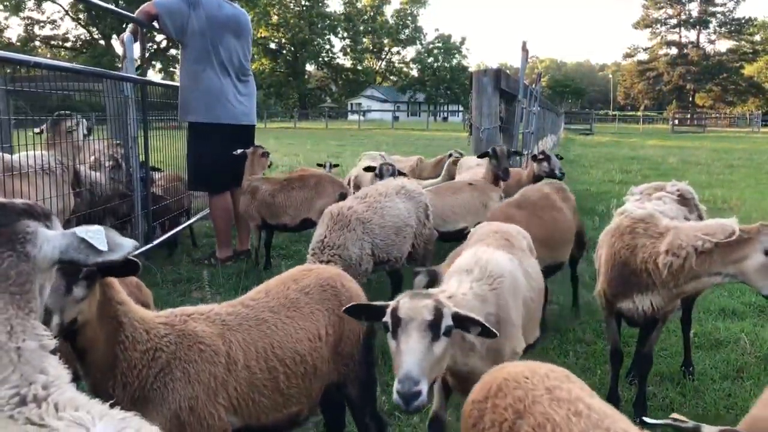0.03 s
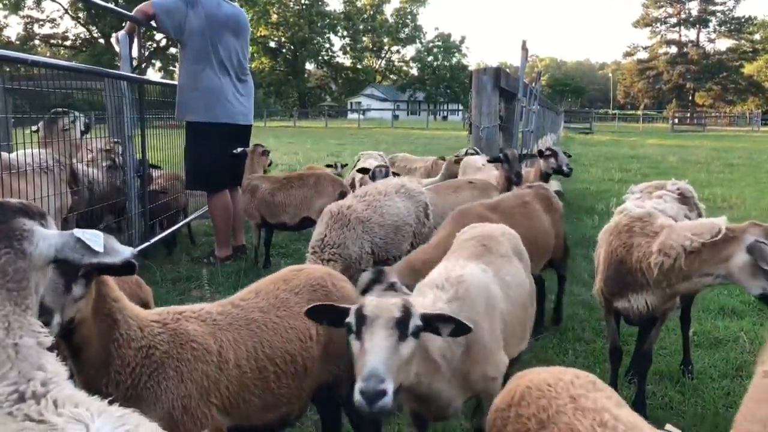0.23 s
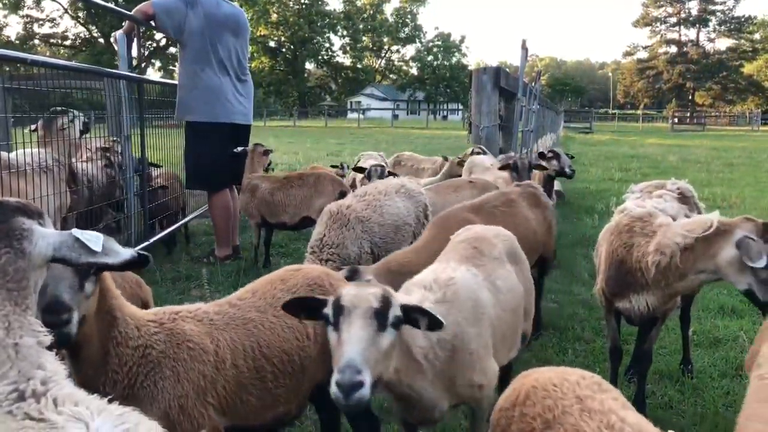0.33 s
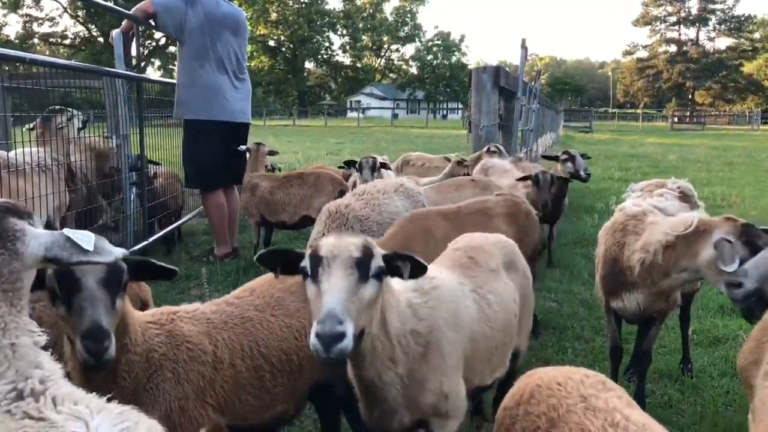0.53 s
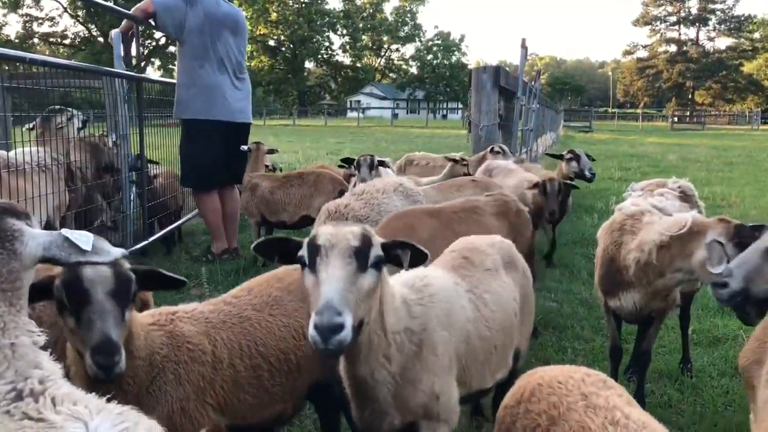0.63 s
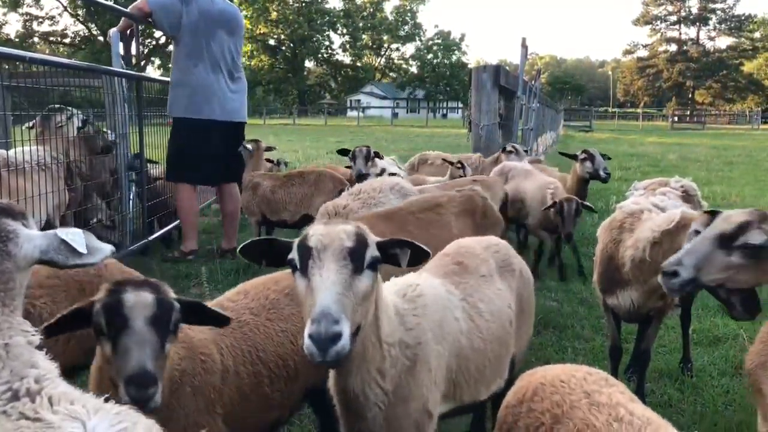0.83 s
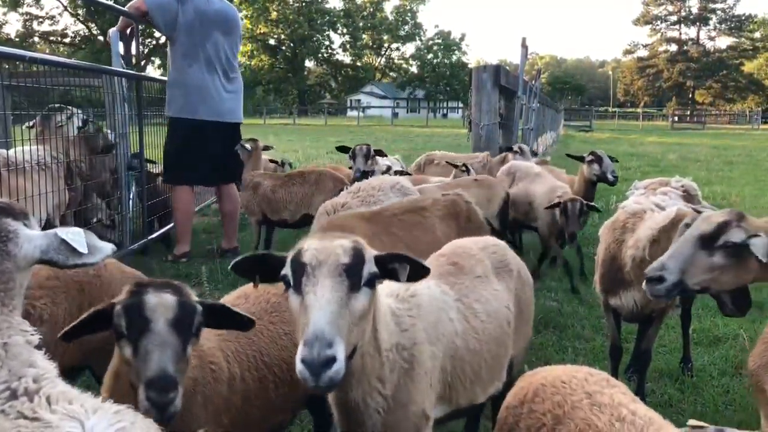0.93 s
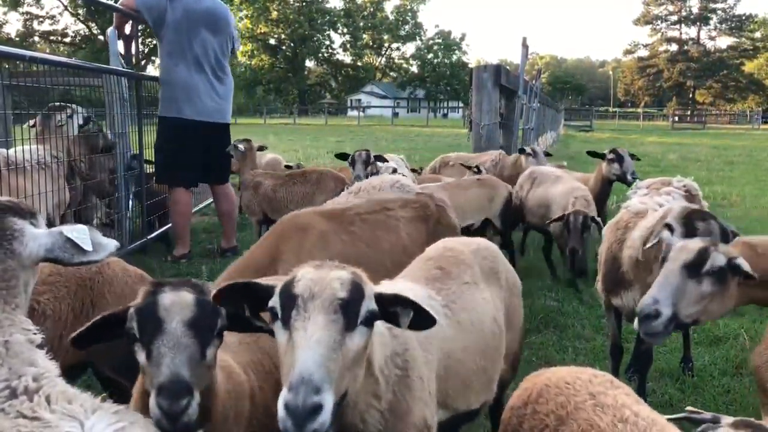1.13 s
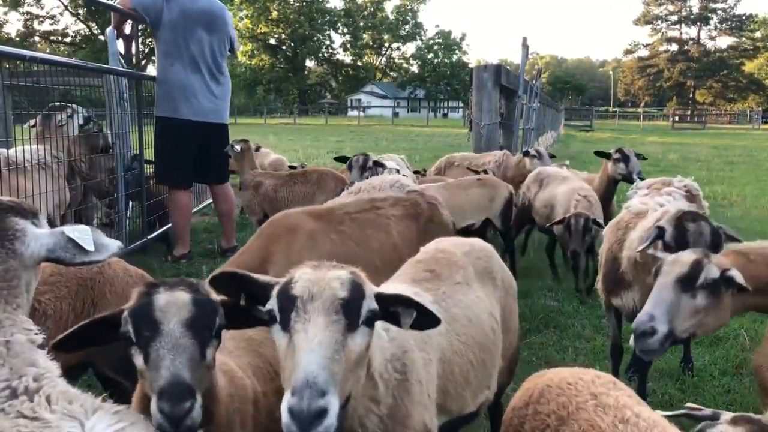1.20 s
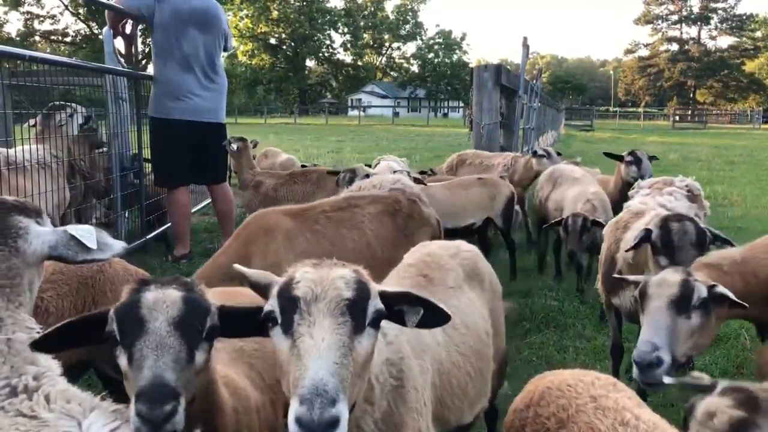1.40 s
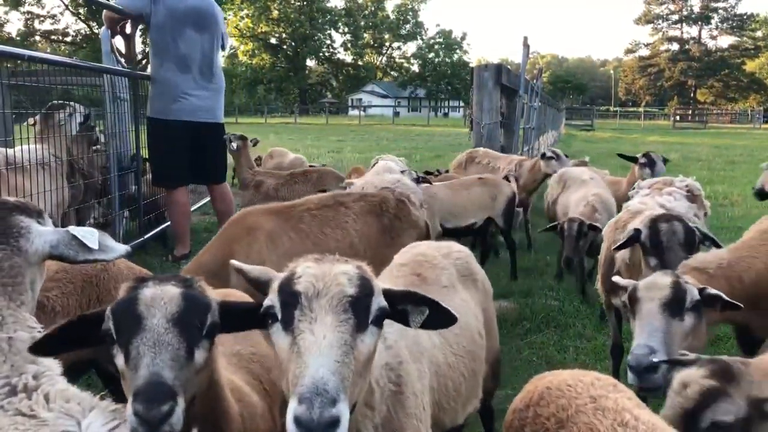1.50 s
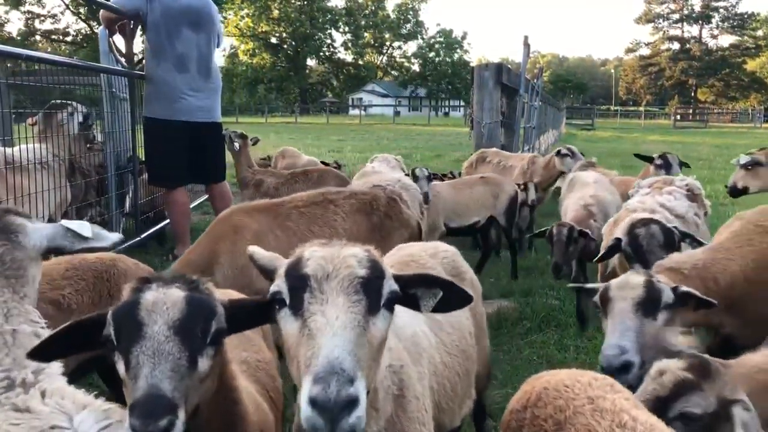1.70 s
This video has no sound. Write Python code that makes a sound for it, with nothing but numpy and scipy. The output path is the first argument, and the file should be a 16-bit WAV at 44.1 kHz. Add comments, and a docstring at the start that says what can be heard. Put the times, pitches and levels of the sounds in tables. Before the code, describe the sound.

A nearby sheep bleats once in a quiet field. After soft hoof thuds around 0.15 seconds, the call starts as a rasp at 0.25, swells into a buzzing, quavering 'eh', loudest near 0.7, and sags away by 1.15. A hoof snaps a stalk at 1.3, and a faint, distant bird chirps near 1.5. Light grass rustle and a low, far engine hum run throughout.

```python
"""A grassy field, where one sheep in a flock gives a long, quavering bleat. Uneven slaps of its vocal
folds and puffs of air ring the throat: the call starts as a rasp, opens into a buzzing 'eh' and sags
away as the jaw closes, scattered by the fence, the flock and the trees. Hooves snap stalks and thud
in the rustling grass, a bird chirps once far off, and a distant engine hums low."""
import sys
import numpy as np
from scipy import signal
from scipy.fft import rfft, irfft, next_fast_len
from scipy.io import wavfile
from scipy.ndimage import uniform_filter1d, map_coordinates

SR = 44100
rng = np.random.default_rng(int(sys.argv[2]) if len(sys.argv) > 2 else 0)


def to_wav(sig):
    """Store sig (one row per channel, or 1-D mono) as 16-bit WAV at the path in sys.argv[1].

    Samples outside -1..1 are clipped; the rate is SR.
    """
    pcm = np.clip(np.atleast_2d(sig), -1, 1) * 32767
    pcm = np.round(pcm).astype(np.int16)
    wavfile.write(sys.argv[1], SR, pcm.T)  # frames by channels


N = 77175
TIME = np.arange(N) / SR

# The quavering tune of the folds. Each row: time in seconds, pitch in Hz.
BLEAT_PITCH = [(.24, 112), (.27, 130), (.297, 115), (.33, 124), (.358, 144), (.378, 133), (.398, 140),
               (.412, 151), (.428, 156), (.461, 141), (.498, 155), (.528, 147.5), (.585, 153), (.652, 139),
               (.68, 156), (.72, 150.5), (.742, 139), (.785, 153.5), (.812, 138), (.842, 134), (.88, 149),
               (.91, 137), (.945, 132), (.985, 138), (1.036, 136), (1.062, 124), (1.085, 125), (1.14, 107)]
# How hard the sheep pushes. Each row: time in seconds, relative level in dB.
BLEAT_EFFORT = [(.23, -58.5), (.238, -47), (.272, -45.5), (.302, -48.5), (.317, -43.5), (.365, -41.5),
                (.395, -38.5), (.43, -36), (.46, -37), (.52, -37), (.63, -35.5), (.71, -35), (.75, -36),
                (.86, -38.5), (.895, -38), (.94, -40.5), (.99, -40), (1.05, -42.5), (1.103, -45),
                (1.122, -53), (1.165, -61.5)]
VOICE_DB, QUAVER_DB_PER_HZ, QUAVER_S = 9, 0.38, 0.037

def bleat():
    """Breath drives the folds through the moving mouth, louder on each crest of the pitch."""
    pitch = curve(BLEAT_PITCH)
    quaver_db = QUAVER_DB_PER_HZ * (pitch - uniform_filter1d(pitch, int(QUAVER_S * SR)))
    gate = (TIME > BLEAT_EFFORT[0][0]) & (TIME < BLEAT_EFFORT[-1][0])
    buzz = smear(vocal_folds(pitch)) * amp(VOICE_DB + curve(BLEAT_EFFORT) + quaver_db) * gate
    return low_ring(mouth(buzz))


# The gravel in the voice. Each row: time in seconds, roughness from 0 to 1.
ROUGHNESS = [(.24, .6), (.37, .55), (.42, .3), (.5, .24), (.72, .22), (.85, .3), (.95, .28), (1.01, .38),
             (1.1, .42)]
# Air forced through the folds. Each row: frequency in Hz, gain in dB.
RASP_EQ = [(100, -26.5), (600, -5), (1200, -17.5), (2500, -9.5), (4500, 7.5), (9000, -6)]
JITTER_S, SHIMMER_DB, RASP_DB = 0.0003, 3, 7.5  # at full roughness
FLAP_SHARE, FLAP_PHASE, PUFF_DECAY = 0.44, 0.425, 1.18

def vocal_folds(pitch):
    """Each cycle is a slap and a fading puff of air; roughness adds a second, weaker flap."""
    roughness = curve(ROUGHNESS)
    cycles = np.cumsum(pitch) / SR
    times = np.interp(np.arange(1, int(cycles[-1])), cycles, TIME)
    jitter, shimmer, flap_jitter, flap_shimmer = rng.standard_normal((len(times), 4)).T
    rough, hz = np.interp(times, TIME, roughness), np.interp(times, TIME, pitch)
    sizes = np.sqrt(SR / hz) * amp(SHIMMER_DB * rough * shimmer)
    slaps = pulses(times + JITTER_S * rough * jitter, sizes)
    flap_sizes = sizes * FLAP_SHARE * rough ** 2 * amp(SHIMMER_DB * flap_shimmer)
    flaps = pulses(times + FLAP_PHASE / hz + 2 * JITTER_S * flap_jitter, flap_sizes)
    puffs = amp(RASP_DB) * roughness * unit(noise(RASP_EQ) * np.exp(-PUFF_DECAY * (cycles % 1)))
    return puffs - slaps - flaps


# The spread of one slap. Each row: frequency in Hz, delay in seconds.
SLAP_LAG = [(300, 0.002), (700, .0018), (1300, 0.00027), (2000, 0.0003), (2700, 0.00131), (4500, 0.00016)]

def smear(x):
    """Delays each frequency so the low ring follows the crack of each slap."""
    size = 2 * next_fast_len(N)
    delay = along(SLAP_LAG, np.fft.rfftfreq(size, 1 / SR))
    phase = 2 * np.pi * np.cumsum(delay) * SR / size
    return irfft(rfft(x, size) * np.exp(-1j * phase), size)[:N]


# Resonances of four mouth shapes. Each row: centre in Hz, width in Hz, relative level in dB.
LIPS_PARTING = [(134, 100, -14.5), (369, 57, -8.5), (622, 39, 4), (973, 147, -13), (1375, 220, -17),
                (1963, 210, -15), (2590, 740, -18.5), (3860, 530, -23)]
WIDE_OPEN = [(162, 24, -11.5), (327, 130, -16), (400, 54, -12.5), (608.6, 53, 2.5), (1070, 86, -19),
             (1347, 187, -10), (1670, 170, -14.5), (2158, 310, -14.5), (2640, 88, -15), (3240, 200, -22),
             (3990, 1100, -24)]
JAW_CLOSING = [(148, 54, -10), (377.5, 67, -3.5), (645, 55, 3.5), (1033, 124, -13), (1295, 105, -3),
               (1720, 190, -14), (2066, 110, -13), (2410, 490, -14.5), (3040, 98, -12), (3700, 930, -21.5)]
MOUTH_SHUT = [(106, 27, 3.5), (210, 55, -10.5), (350, 110, -6), (1230, 250, -16)]
# The morph between them. Each row: time in seconds, shape (0 parting, 1 open, 2 closing, 3 shut).
MOUTH_MORPH = [(.41, 0), (.55, 1), (.79, 1.5), (.93, 2), (1.103, 2), (1.13, 4)]
# Resonances that glide with tongue and jaw. Each row: time in seconds, centre in Hz.
TONGUE_GLIDE = [(.28, 2150), (.37, 2310), (.42, 2330), (.47, 2050), (.53, 1930), (.57, 1920), (.63, 2060),
                (.7, 2250), (.76, 2390), (.86, 2150), (.93, 2150), (1.1, 2160)]
JAW_GLIDE = [(.28, 1230), (.4, 1530), (.45, 1580), (.52, 1430), (.59, 1250), (.7, 1130), (.8, 1250),
             (.88, 1330), (.97, 1410), (1.1, 1270)]

def mouth(buzz):
    """The mouth opens and shuts, shaping the vowel, while tongue and jaw sweep two more peaks."""
    morph = curve(MOUTH_MORPH)
    shapes = [LIPS_PARTING, WIDE_OPEN, JAW_CLOSING, MOUTH_SHUT]
    voice = sum(throat(buzz * np.maximum(1 - abs(morph - k), 0), shape) for k, shape in enumerate(shapes))
    tongue = gliding_peak(voice, TONGUE_GLIDE, width_hz=280)
    jaw = amp(-9) * gliding_peak(voice, JAW_GLIDE, width_hz=220)
    return voice + tongue + jaw


# The tone of one pulse of the folds. Each row: frequency in Hz, gain in dB.
FOLD_EQ = [(60, -19), (130, 9), (670, 5), (800, 0), (950, 5), (2700, 3), (3400, -3.5), (4800, -3.5),
           (5500, -4.5), (8000, 3), (15000, -28)]
FLANK_STEEPNESS = 1.367

def throat(x, resonances):
    """Rings one shape of the throat; every shape has equal power in the buzzing mids."""
    def gain(hz):
        power = sum(amp(db) ** 2 / (1 + (2 * (hz - centre) / width) ** 2) ** FLANK_STEEPNESS
                    for centre, width, db in resonances)
        response = np.sqrt(power) * amp(along(FOLD_EQ, hz))
        mids = response[(hz > 1000) & (hz < 3000)]
        return response / np.sqrt(np.mean(mids ** 2))
    return coloured(x, gain)


# The body of the voice. Each row: time in seconds, low-end gain in dB.
LOW_RING_GAIN = [(.24, 2.5), (.275, 1), (.3, -2.5), (.325, 2.5), (.37, 0), (.4, 2.5), (.437, 0), (.46, 0),
                 (.495, 2.5), (.54, -1), (.595, -1.5), (.65, -1.5), (.695, -0.5), (.745, -0.5), (.785, 2.5),
                 (.825, -0.5), (.88, 2), (1.03, 0.5), (1.1, 0.5)]

def low_ring(voice, below_hz=850):
    """The bass and first resonance swell and dip through the call."""
    lows = signal.sosfiltfilt(signal.butter(4, below_hz, fs=SR, output='sos'), voice)
    return voice + (amp(curve(LOW_RING_GAIN)) - 1) * lows


# Hooves on turf. Each row: start in seconds, thud pitch in Hz, then thud, snap and crunch gains in dB.
HOOF_STEPS = [(0.125, 202, -50, -73, -66), (0.159, 320, -51, -62, -64), (0.174, 196, -33.5, -68, -66),
              (1.2808, 331, -43.5, -39.5, -49.5), (1.297, 180, -53, -55, -60), (1.368, 109, -51, -65, -63)]
# A stalk snapping and the sod giving way. Each row: frequency in Hz, gain in dB.
SNAP_EQ = [(300, -28), (1200, -12), (2200, -13), (3500, 4), (5200, 3), (7000, -11), (11000, -11),
           (15000, -18)]
TURF_EQ = [(100, -12), (350, 3), (600, -8), (1000, 8), (1600, -12), (5000, -25), (15000, -40)]
SNAP_T60_S, THUD_T60_S, TURF_T60_S = 0.016, 0.042, 0.09
THUD_LAG_S, THUD_RISE_S = 0.0034, 0.0019

def hooves():
    """Each step snaps a stalk, then lands with a thud and a short crunch of turf."""
    out = np.zeros(N)
    for start, hz, thud_db, snap_db, turf_db in HOOF_STEPS:
        age = np.maximum(TIME - start, 0)
        landed = np.maximum(age - THUD_LAG_S, 0)
        press = 1 - np.exp(-landed / THUD_RISE_S)
        out += amp(snap_db - 60 * age / SNAP_T60_S) * (age > 0) * noise(SNAP_EQ)
        out += amp(thud_db - 60 * landed / THUD_T60_S) * 2 * press * np.sin(2 * np.pi * hz * landed)
        out += amp(turf_db - 60 * age / TURF_T60_S) * (age > 0) * noise(TURF_EQ)
    return out


def bird(peak_s=1.478, half_width_s=0.011, hz=2540, rise_hz_per_s=7000, level_db=-55):
    """One short, rising, slightly blurred chirp, far off."""
    t = TIME - peak_s
    phase = 2 * np.pi * (hz + rise_hz_per_s * t / 2) * t + 0.7 * wobble(400)
    return amp(level_db) * np.exp(-(t / half_width_s) ** 2) * np.sin(phase)


# The tail from field and tree line. Each row: frequency in Hz, seconds to fade by 60 dB.
TAIL_T60 = [(150, 0.12), (1300, 0.66), (2600, 1), (8000, 0.031)]
SCATTER_DB, SCATTER_S, SCATTER_ABOVE_HZ, TAIL_DB = -7, 0.011, 1200, -23
FLOCK_SWAY_S = 0.00015

def field_echoes(x, taps=12):
    """Adds shifting near scatter from the fence and milling flock, and a faint tail from the trees."""
    hz, t, bands = signal.stft(rng.standard_normal(SR // 2), SR, nperseg=256)
    impulse = signal.istft(bands * amp(-60 * t / along(TAIL_T60, hz)[:, None]), SR, nperseg=256)[1]
    tail = signal.fftconvolve(x, impulse / np.linalg.norm(impulse))[:N]
    treble = signal.lfilter(*signal.butter(2, SCATTER_ABOVE_HZ, 'high', fs=SR), x)
    scatter = np.zeros(N)
    for k in range(taps):
        delay = SCATTER_S * (k + 1 + rng.random()) / taps + FLOCK_SWAY_S * wobble(5)
        scatter += (-1) ** k * np.interp(TIME - delay, TIME, treble)
    return x + amp(SCATTER_DB) * scatter / np.sqrt(taps) + amp(TAIL_DB) * tail


def engine(hz=48.6, hum_db=-41.5, beat_hz=0.5, null_s=1.29):
    """A distant hum whose fundamental beats slowly under two steady overtones."""
    phase = 2 * np.pi * hz * TIME + 0.032 * wobble(1.5)
    beat = amp(hum_db) * np.sin(np.pi * beat_hz * (TIME - null_s))
    overtones = amp(-61) * np.sin(2 * phase) + amp(-63.5) * np.sin(3 * phase)
    return np.sqrt(2) * (beat * np.sin(phase) + overtones)


# The tone of the air and grass beds. Each row: frequency in Hz, gain in dB.
AIR_EQ = [(20, -60), (40, -12), (70, 1.5), (150, 2.5), (350, -5), (600, -10), (1200, -13.5), (2000, -18),
          (5000, -27.5), (15000, -49)]
GRASS_EQ = [(800, -15), (2300, -6), (3300, -3), (4900, 1.5), (6500, -2), (8000, -4.5), (11000, -5.5),
            (13000, -7.5), (15500, -8)]
# Their slow swells. Each row: time in seconds, level in dB.
AIR_SWELL = [(0, -51.5), (.17, -49), (.6, -57.5), (1.2, -54), (1.38, -53), (1.55, -58), (1.75, -55.5)]
GRASS_SWELL = [(0, -56.5), (.3, -58.5), (.9, -55.5), (1.22, -59.5), (1.42, -55.5), (1.56, -53.5),
               (1.75, -53.5)]

def pasture():
    """Low outdoor air and the fine, flickering rustle of grass under the flock."""
    air = noise(AIR_EQ) * amp(curve(AIR_SWELL) + 0.14 * wobble(12))
    grass = noise(GRASS_EQ) * amp(curve(GRASS_SWELL) + 1.25 * wobble(90) + 0.69 * wobble(980))
    return air + grass


def amp(db):
    """Decibels to gain."""
    return 10 ** (np.asarray(db) / 20)


def unit(x):
    """Scaled to rms 1."""
    return x / np.sqrt(np.mean(x ** 2) + 1e-20)


def along(points, hz):
    """Reads (Hz, value) points on a log frequency axis."""
    freqs, values = np.transpose(points)
    return np.interp(np.log(hz + 1), np.log(freqs + 1), values)


def curve(points):
    """Joins (seconds, value) points, one value per sample."""
    return np.interp(TIME, *np.transpose(points))


def wobble(rate):
    """A smooth random curve, rate knots a second."""
    return map_coordinates(rng.standard_normal(int(N * rate / SR) + 4), [TIME * rate])


def coloured(x, gain):
    """x through a minimum-phase filter with this gain over frequency."""
    size = 2 * next_fast_len(N)
    response = np.maximum(gain(np.fft.rfftfreq(size, 1 / SR)), 1e-6)
    cepstrum = irfft(np.log(response), size)
    cepstrum[1:size // 2] *= 2
    cepstrum[size // 2 + 1:] = 0
    return irfft(rfft(x, size) * np.exp(rfft(cepstrum)), size)[:N]


def noise(eq):
    """Coloured noise of rms 1."""
    return unit(coloured(rng.standard_normal(N), lambda hz: amp(along(eq, hz))))


def pulses(times, sizes):
    """Impulses placed between samples with a windowed sinc."""
    at = times[:, None] * SR
    index = np.floor(at).astype(int) + np.arange(-7, 9)
    taps = np.sinc(index - at) * np.sinc((index - at) / 8)
    return np.bincount(np.clip(index, 0, N).ravel(), (taps * sizes[:, None]).ravel(), N + 1)[:N]


def gliding_peak(x, track, width_hz):
    """A resonance that follows (seconds, Hz) points by crossfading a row of still ones."""
    hz = curve(track)
    centres, spacing = np.linspace(hz.min(), hz.max(), num=8, retstep=True)
    out = np.zeros(N)
    for centre in centres:
        fade = np.maximum(1 - abs(hz - centre) / spacing, 0)
        out += fade * signal.lfilter(*signal.iirpeak(centre, centre / width_hz, SR), x)
    return out


def scene():
    """Sheep and bird echo across the field, over hooves, engine, air and grass, in mono."""
    return (field_echoes(bleat() + bird()) + hooves() + engine() + pasture())[None]


def record(dry, top_hz=15800):
    """A brick-wall low-pass trims the very top."""
    size = next_fast_len(N + SR // 2)
    passband = np.fft.rfftfreq(size, 1 / SR) < top_hz
    return irfft(rfft(dry, size) * passband, size)[..., :N]


dry = scene()
out = record(dry)
to_wav(out)
```